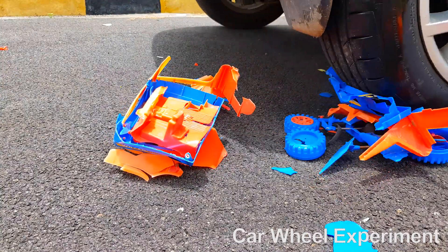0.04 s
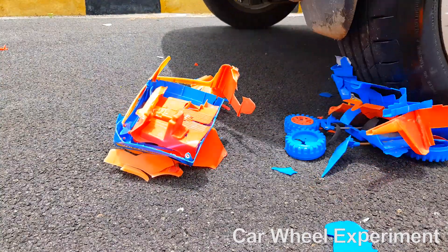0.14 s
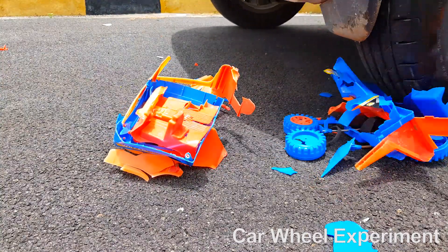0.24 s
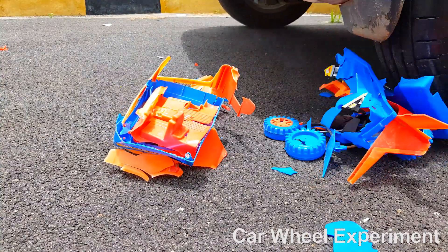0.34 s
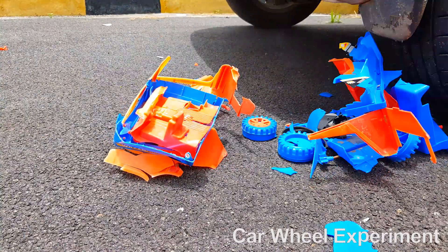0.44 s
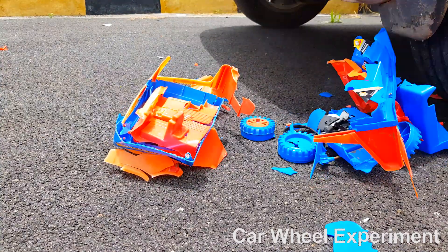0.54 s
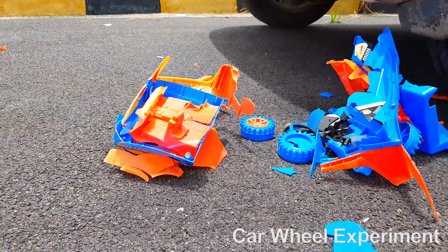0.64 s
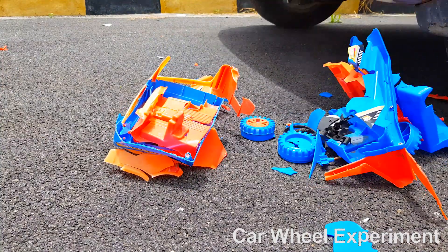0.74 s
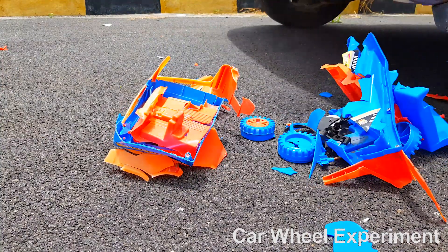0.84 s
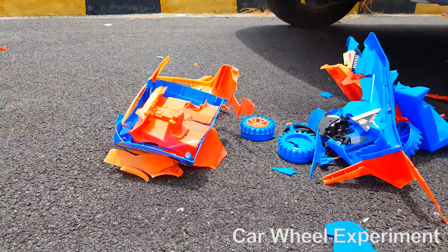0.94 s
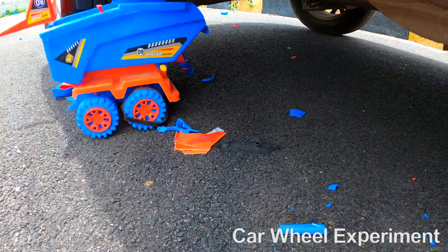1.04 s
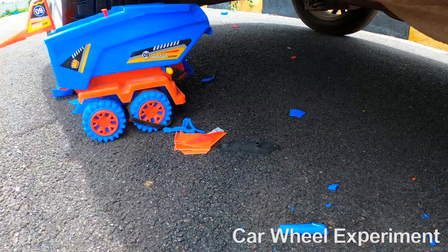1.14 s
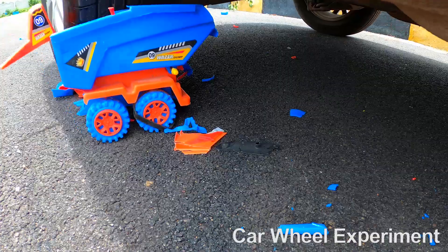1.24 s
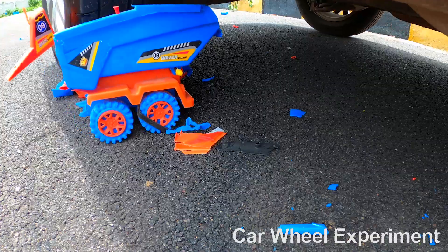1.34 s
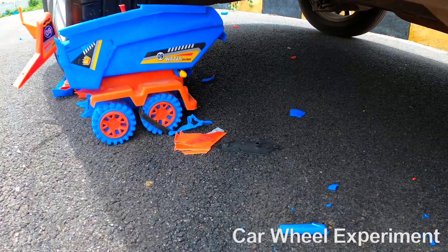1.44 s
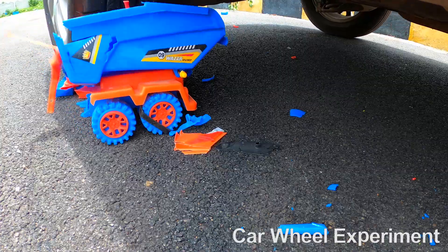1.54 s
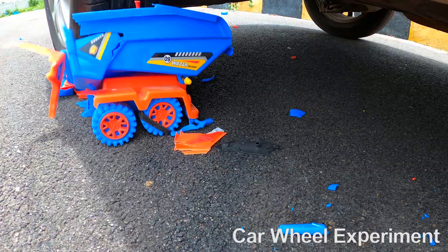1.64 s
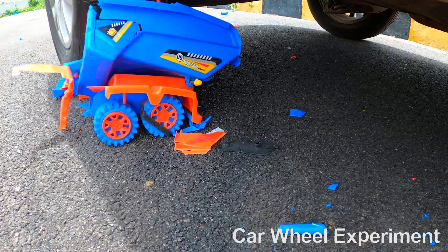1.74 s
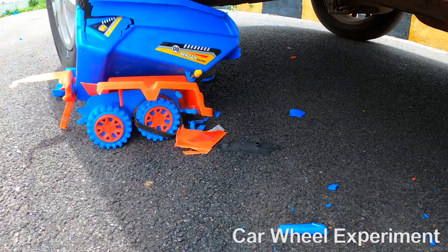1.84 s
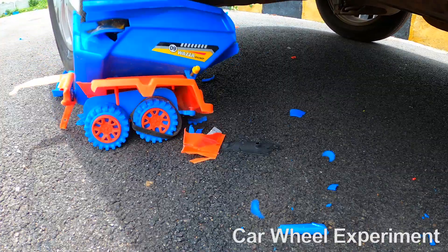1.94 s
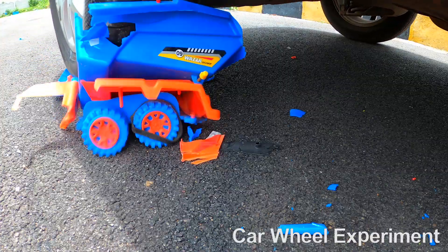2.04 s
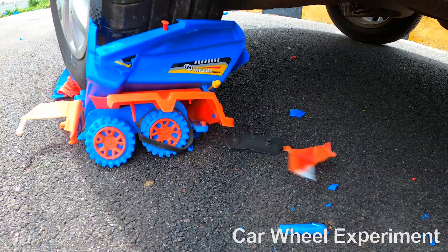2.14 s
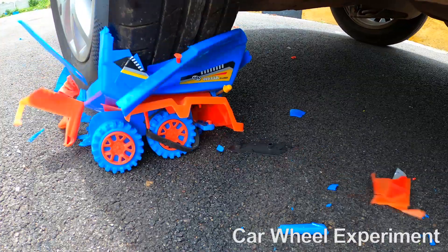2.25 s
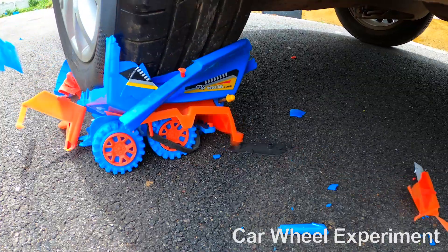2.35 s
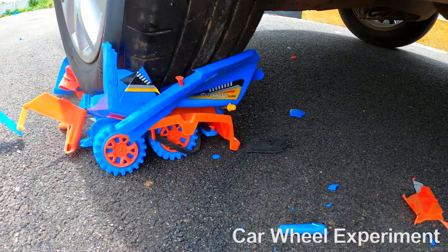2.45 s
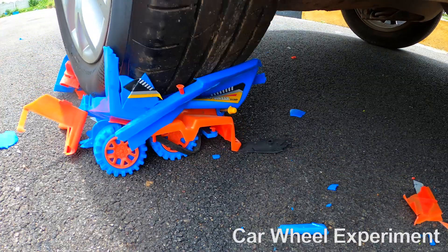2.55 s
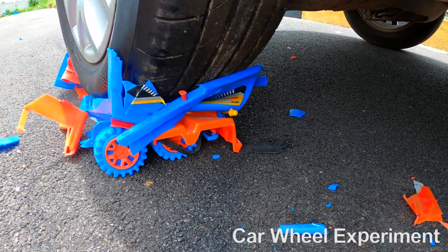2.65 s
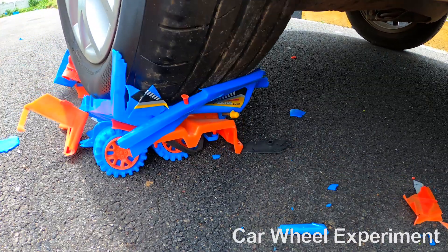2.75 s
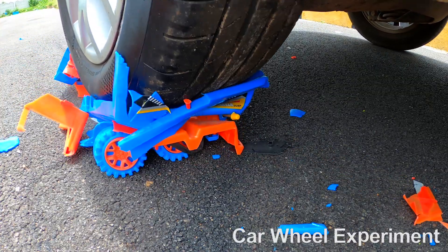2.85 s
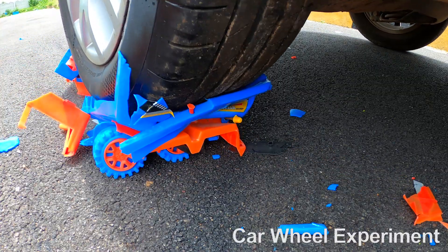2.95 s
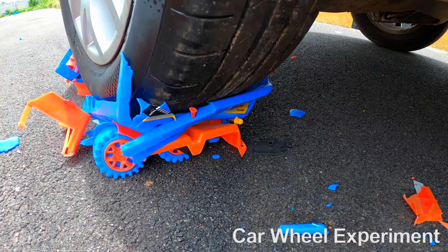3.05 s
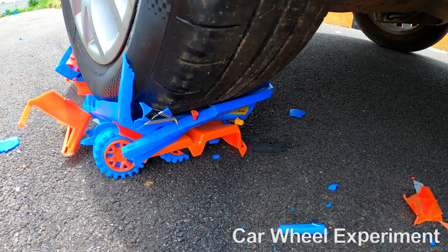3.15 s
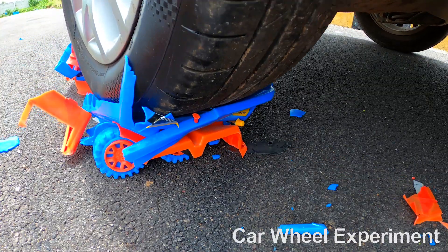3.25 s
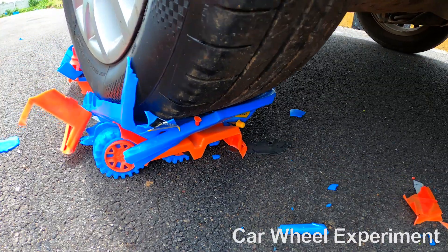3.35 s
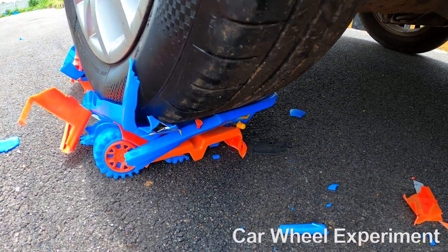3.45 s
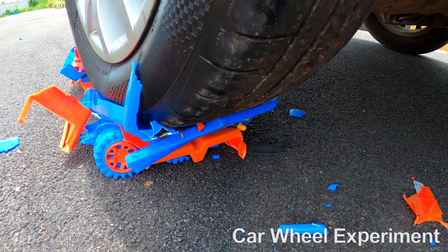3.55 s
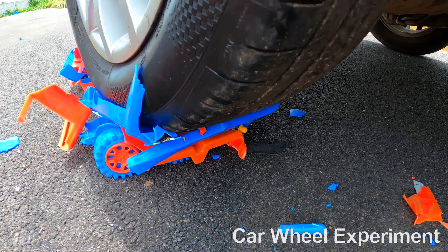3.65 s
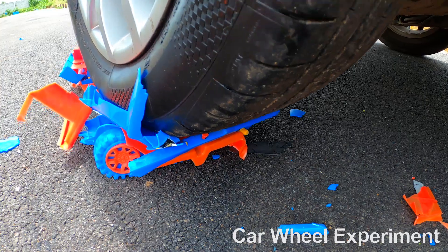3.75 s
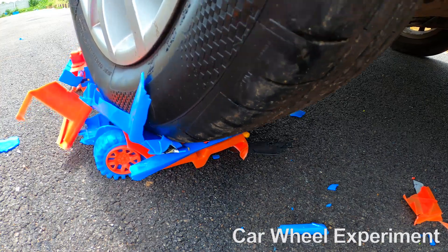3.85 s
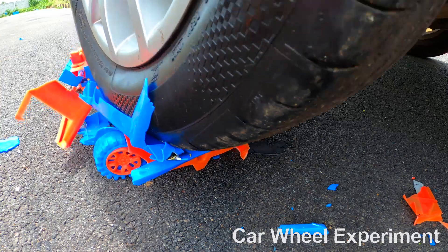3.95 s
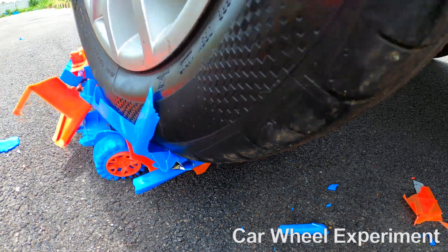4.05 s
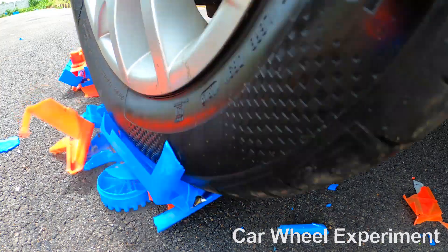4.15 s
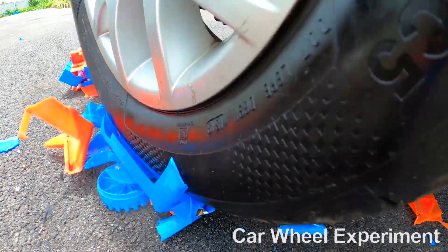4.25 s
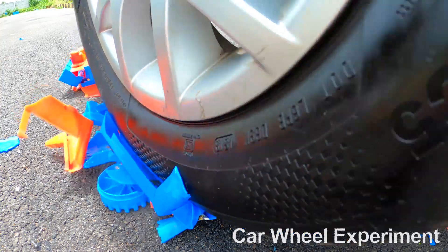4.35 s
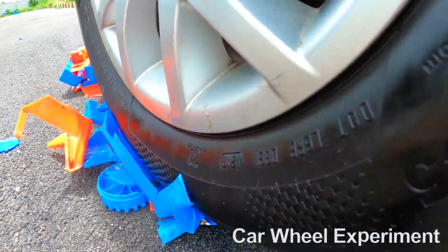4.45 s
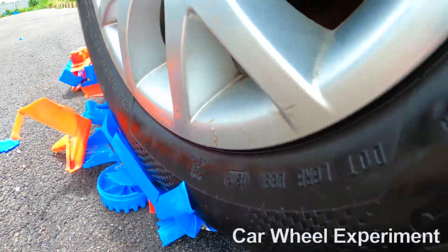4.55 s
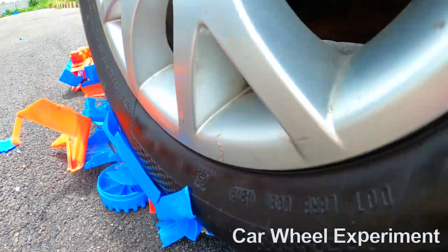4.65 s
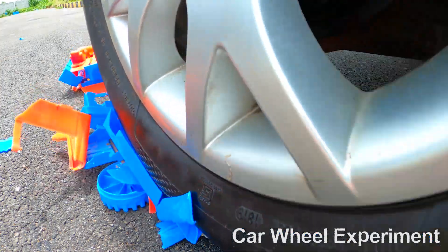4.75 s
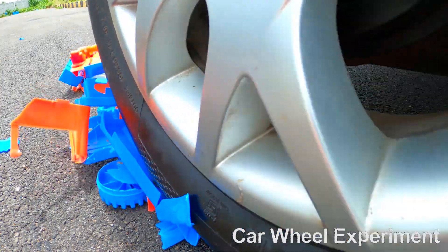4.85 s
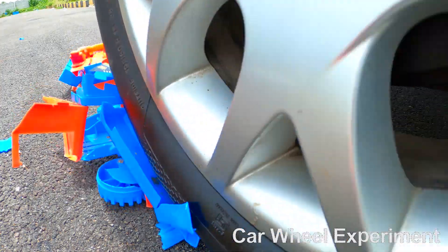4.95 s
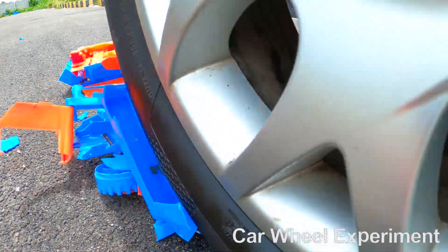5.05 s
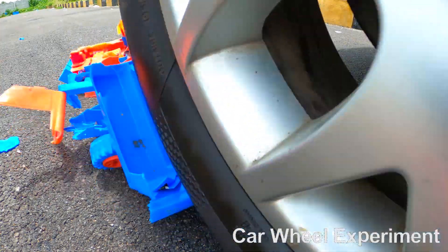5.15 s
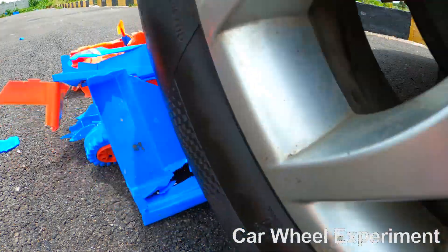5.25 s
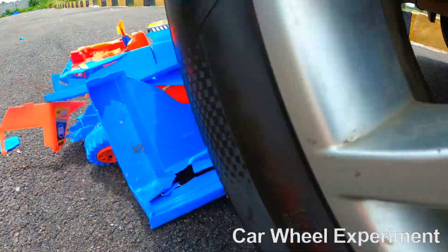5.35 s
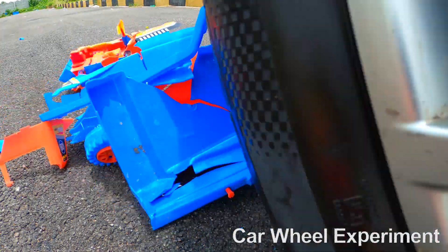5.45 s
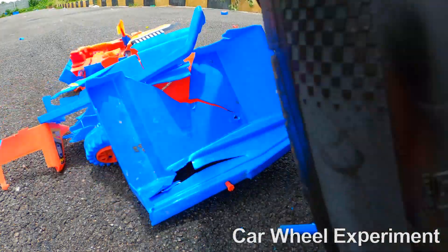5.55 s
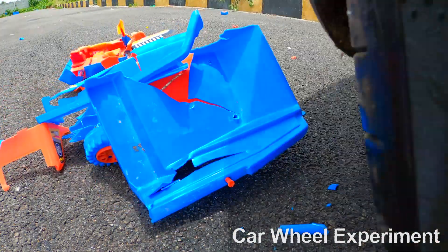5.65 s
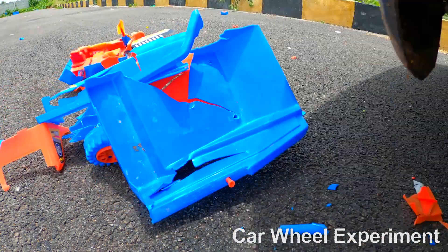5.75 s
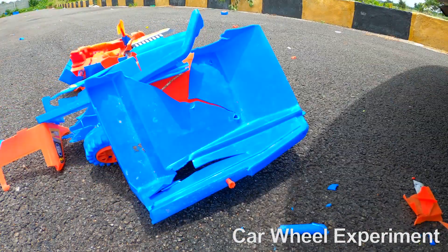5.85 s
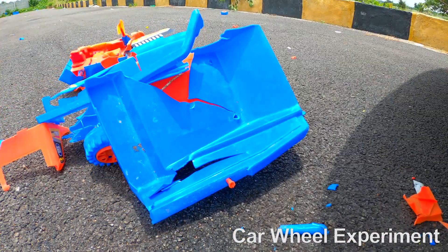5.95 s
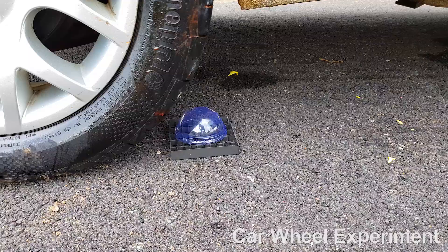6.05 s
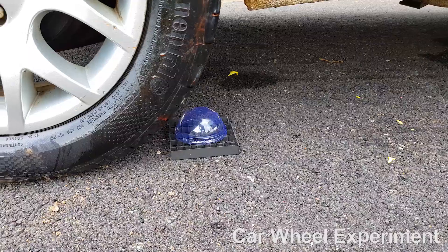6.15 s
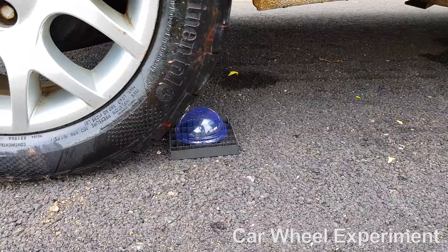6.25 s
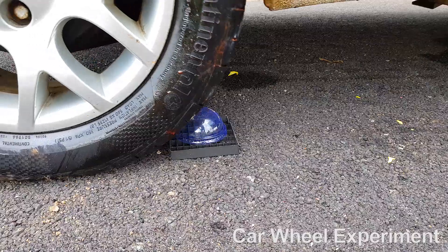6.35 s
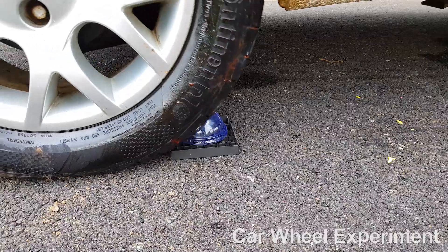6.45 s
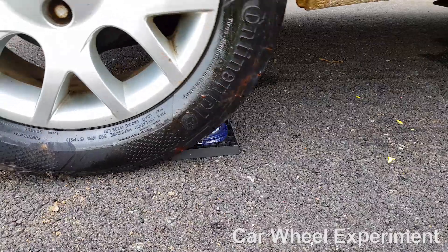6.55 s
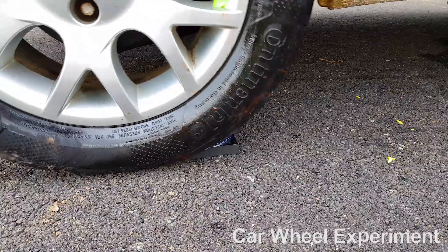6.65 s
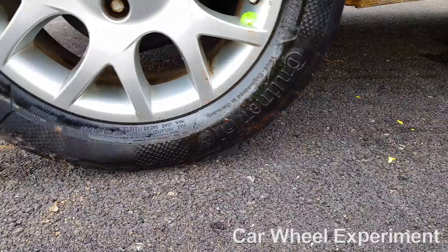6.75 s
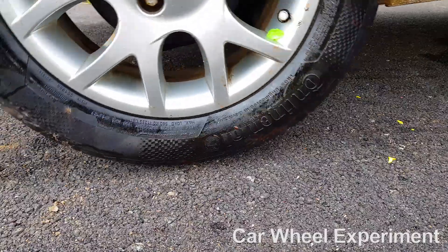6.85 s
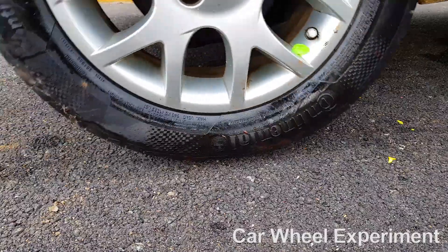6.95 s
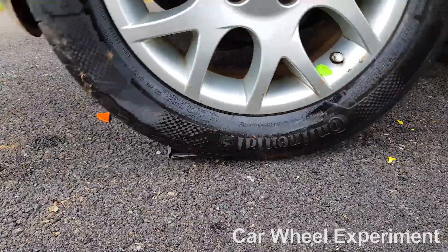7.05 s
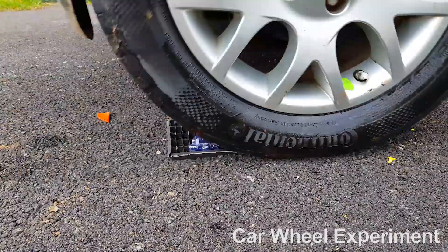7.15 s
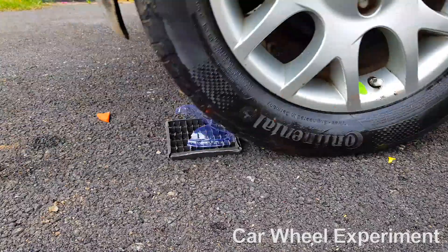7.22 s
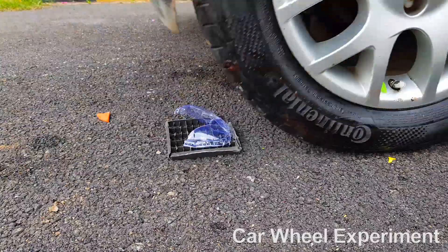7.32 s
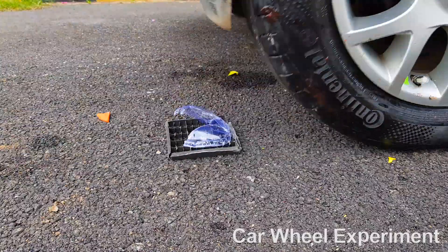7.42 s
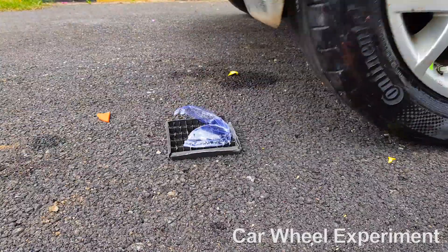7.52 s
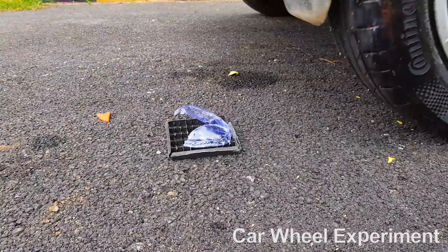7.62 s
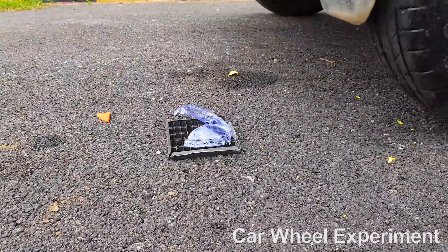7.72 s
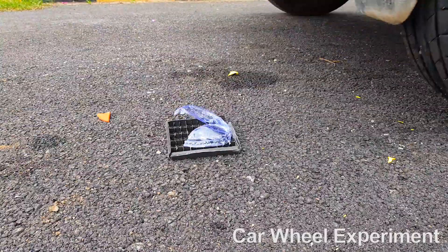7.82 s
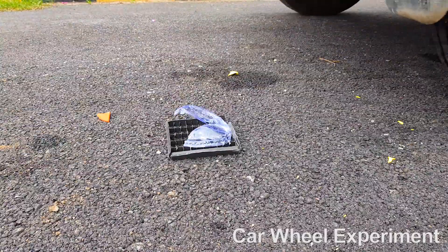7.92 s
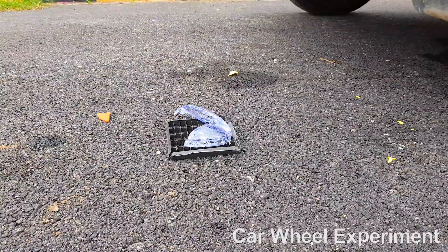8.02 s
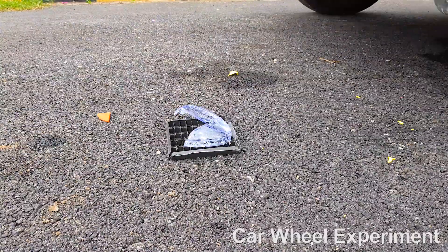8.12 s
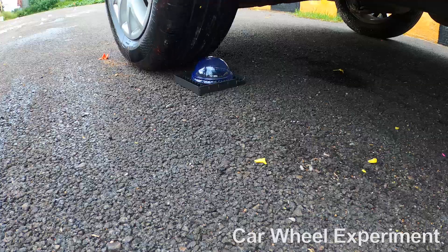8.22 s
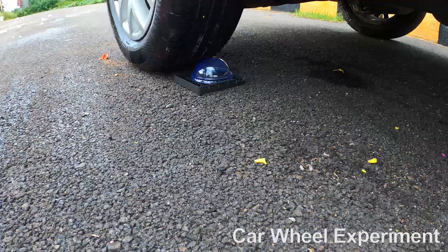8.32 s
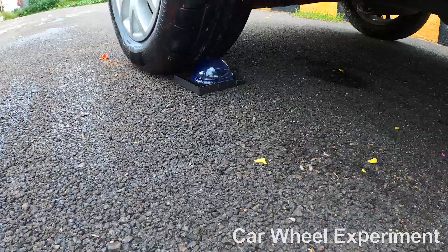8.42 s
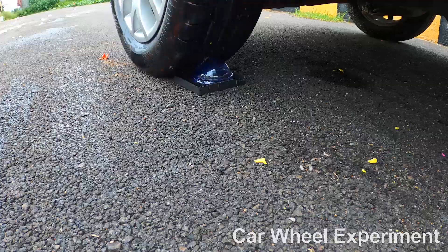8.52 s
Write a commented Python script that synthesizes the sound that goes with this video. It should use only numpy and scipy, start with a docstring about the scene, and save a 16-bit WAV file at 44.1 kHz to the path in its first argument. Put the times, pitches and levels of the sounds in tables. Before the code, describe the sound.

Close stereo sound outdoors on a road, in four abruptly joined parts. From 0 to 1 s it is quiet: light plastic fragments drag over grit and clack, mostly around 0.1 to 0.6 s. At 1.05 s a low throbbing car engine enters with gritty, hollow scraping and dry cracks; from 1.8 to 2.6 s heavy snaps and deep tyre thuds come thickly. Cracks become sparser from 2.7 to 4.2 s, with a thud near 3.1, then a dense burst at 4.2 to 4.5. A last scrape and snaps come around 5.2 to 5.4 s, leaving engine rumble. At 6.1 s the cut brings fan air and whirr; a thin dome splinters brightly from 6.5 to 7.2 s with thuds and hollow base knocks. Engine and fan recede with one small crack at 7.6. From 8.2 s a loud, steady engine drone and fan rush remain alone.

```python
"""Car crushing plastic toys

A car creeps over a hollow plastic toy truck on asphalt, then a small clear plastic dome, in four shots
joined by hard cuts. Loose shards clack first; then the toy grinds, snaps and thuds, and the dome splinters.
Cracks are runs of tiny clicks shaped by a ring; scraping and air are noise; engine and thuds are sine waves.
The last shot is only the engine and cooling fan, loud and facing the small stereo microphone outdoors."""
import sys
import numpy as np
from scipy import signal
from scipy.fft import rfft, irfft, next_fast_len
from scipy.io import wavfile
from scipy.ndimage import uniform_filter1d

SR = 44100
rng = np.random.default_rng(int(sys.argv[2]) if len(sys.argv) > 2 else 0)


def master_out(mix):
    """Clip the mix to full scale and print it as 16-bit PCM to the path in sys.argv[1]."""
    frames = np.transpose(np.atleast_2d(mix))
    ceiling = np.clip(frames, -1, 1)
    pcm = np.round(ceiling * 32767).astype(np.int16)
    wavfile.write(sys.argv[1], SR, pcm)


N = 378378
TIME = np.arange(N) / SR

# hard cuts, the starts of the toy shot, the dome shot and the facing shot: t/s
SHOT_STARTS = (1.046, 6.12, 8.22)
TOY_START, DOME_START, FACING_START = SHOT_STARTS

# engine beside the toy as heard, its level sinking after loud cracks and recovering: t/s, base level/dB
ENGINE_LEVEL = [(1.1, -26), (1.78, -26.5), (2.11, -37), (2.21, -31.5), (2.87, -39), (4.11, -28),
                (4.66, -37.5), (6.08, -25.5)]
# engine beside the dome: t/s, firing rate f/Hz, base level/dB
DRIVE_OFF = [(6.12, 34.5, -61), (6.6, 35.2, -40), (7.3, 30.47, -38.5), (7.45, 32.4, -33), (7.62, 35.4, -37),
             (7.85, 34.86, -36), (8.15, 30.43, -38)]
# deep engine noise: f/Hz, level/dB per Hz
RUMBLE = [(30, 3), (60, 7.5), (110, -9), (180, -24)]
# pulsing engine rustle: f/Hz, level/dB per Hz
RUSTLE = [(125, -10.5), (185, 7.5), (330, -4), (640, -9.5), (1100, -4.5), (2000, -14), (4500, -19),
          (7000, -42), (8500, -60)]
# fan blade tones: f/Hz, level/dB relative to each other
FAN_TONES = [(134.4, -9.5), (167.5, -3.5), (235.6, 6), (302, -2.5), (403.5, -0.5)]
# rushing fan air: f/Hz, level/dB per Hz
WHOOSH = [(45, -11), (75, -0.5), (150, -8), (270, -10.5), (450, -9.5), (800, -14.5), (1300, -27),
          (2500, -34.5)]
# high hiss of the fan: f/Hz, level/dB per Hz
HISS = [(1400, -9), (3500, 10.5), (5200, -10), (7000, 6), (9500, -8), (16000, 2)]
# noise of the car facing the microphone: f/Hz, level/dB per Hz
FACING_NOISE = [(35, 3), (130, -8), (260, -4), (600, -8.5), (1250, -23.5), (4000, -30.5), (8000, -45.5),
                (15000, -99)]

# how alike left and right are near the toy: f/Hz, likeness (0-1)
TOY_LIKENESS = [(2000, 0.98), (5000, 0.89), (8000, 0.78), (14000, 0.1)]
# how alike left and right are near the dome: f/Hz, likeness (0-1)
DOME_LIKENESS = [(100, 0.94), (500, 0.56), (1200, 0.039), (3000, 0.27), (6000, 0.21), (14000, 0.057)]
# left and right fully alike, for sound from ahead: f/Hz, likeness (0-1)
AHEAD_LIKENESS = [(100, 1)]

# loose fragments dragged out from under the tyre: start t/s, length t/s, level/dB
DRAGS = [(0, .01, -67.5), (0.07, 0.018, -60), (0.15, 0.065, -59.5), (0.225, 0.037, -45.5),
         (0.32, 0.084, -40), (0.62, 0.067, -66.5)]
# colour of the dragged fragments: f/Hz, level/dB per Hz
FRAGMENTS = [(220, -17), (400, -16), (1200, 1), (2500, -4.5), (6000, -18), (10000, -14.5), (16000, -35)]
# clacks of loose shards: t/s, level/dB, ring f/Hz, brightness level/dB per octave, contact t/s
CLACKS = [(0.1243, -41.5, 10000, 10.5, 0.0004), (0.240, -35.5, 1200, -2.5, 0.0047),
          (0.264, -38.5, 1400, -4, 0.003), (0.56, -51, 3300, -1, 0.0018), (0.304, -37, 1000, -2, 0.003)]
# the wheel pushes the shell over grit: start t/s, length t/s, scrape base level/dB, crackle level/dB
SHOVES = [(1.055, 0.12, -26.5, -38.5), (1.1, 0.14, -24.5, -41), (1.3, 0.09, -23.5, -42),
          (1.4, 0.15, -34.5, -42), (1.51, 0.088, -26.5, -38.5), (1.63, 0.045, -24.5, -36.5),
          (1.775, 0.022, -19.5, -39), (1.85, 0.067, -27, -44), (2.05, 0.047, -32, -36.5),
          (2.18, 0.013, -26.5, -34), (2.225, 0.077, -30.5, -29), (2.39, 0.022, -28.5, -29.5),
          (3.13, 0.011, -39, -28), (4.32, 0.043, -28.5, -29), (5.05, 0.13, -54, -46.5),
          (5.21, 0.24, -35, -38.5), (5.325, 0.037, -27.5, -32.5)]
# colour of the shell's scraping: f/Hz, gain of a wall mode there level/dB
SCRAPE = [(120, 2), (250, 0.5), (380, -1), (750, 0), (1200, -2.5), (2000, -16), (3000, -29)]
# colour of the fine crackle: f/Hz, level/dB per Hz
CRACKLE = [(800, 7), (2000, 15), (4800, 3.5), (8000, -9), (16000, -51)]

# the tyre drops as a wall collapses: t/s, base level/dB
THUDS = [(1.838, -13.5), (1.931, -12.5), (2.06, -13.5), (2.178, -13), (2.287, -9), (2.408, -15),
         (2.587, -18), (2.617, -21.5), (3.137, -17), (4.222, -18), (4.329, -11), (4.36, -12), (4.439, -18),
         (6.698, -17), (7.019, -29)]
# tyre carcass and the air inside it: f/Hz, level/dB relative to the thud, 60 dB fade t/s
TYRE_MODES = [(71.4, -7.5, 0.19), (97.6, -6.5, 0.28), (141.3, -7.5, 0.12), (214.6, -4.5, 0.044),
              (242.0, -23.5, 1.0)]

# how hard the dome crackles under the tread: t/s, base level/dB
DOME_STRAIN = [(6.42, -56), (6.56, -36.5), (6.72, -40), (6.86, -43), (6.92, -53), (7.135, -48), (7.15, -36),
               (7.21, -36), (7.25, -70)]
# breaks of the thin dome: t/s, level/dB, ring f/Hz, brightness level/dB per octave, tear t/s
DOME_CRACKS = [(6.5366, -24.0, 1110, -0.5, 0.009), (6.5595, -22, 4550, -5, 0.0074),
               (6.6134, -19.5, 2140, 0.5, 0.0019), (6.6173, -15, 1030, 1.5, 0.0038),
               (6.6259, -21.5, 910.0, 1, 0.0037), (6.6888, -20, 600.0, -1, 0.0015),
               (6.7547, -23, 2440.0, -1, 0.001), (6.7761, -22.5, 2640, -2.5, 0.0027),
               (6.83, -27, 3720.0, 1, 0.0012), (6.8466, -23, 3720.0, -1.5, 0.0019),
               (6.8572, -19.5, 3600, 0, 0.00092), (6.9829, -27, 634, -1.5, 0.0024),
               (7.0111, -19, 3700, -2, 0.001), (7.143, -25, 3440, 2, 0.0015),
               (7.1899, -25.5, 3180, 4, 0.0071), (7.2136, -32.5, 4280.0, 0.5, 0.002),
               (7.6398, -33, 1880, -2.5, 0.0025)]
# colour of a dome snap: f/Hz, level/dB per Hz
DOME_SNAP = [(150, -22), (400, -3.5), (1000, 1.5), (5000, -1.5), (15000, -9.5)]
# the base plate rocks as the tread leaves it: t/s, base level/dB
PLATE_KNOCKS = [(6.689, -14.5), (6.704, -18.5), (6.984, -13.5), (7.012, -18.5), (7.031, -18.5)]
# ringing of the dome's base plate: f/Hz, level/dB relative to the knock, 60 dB fade t/s
PLATE_MODES = [(445, -2.5, 0.03), (562, -1, 0.044), (713, -3, 0.054), (910, -12.5, 0.063)]
# breaks of the toy: t/s, level/dB, ring f/Hz, brightness level/dB per octave, tear t/s
TOY_CRACKS = [(1.047, -25.5, 600.0, 2, 0.0032), (1.1186, -23.5, 1140, -6, 0.001),
              (1.1434, -22, 600.0, -3.0, 0.0061), (1.1567, -25, 2440.0, -1.5, 0.0034),
              (1.1978, -18.5, 790.0, -4.5, 0.0078), (1.2489, -19, 850.0, -3.0, 0.0049),
              (1.2785, -28.5, 2800, 1.5, 0.004), (1.3052, -21.5, 740.0, -6.5, 0.007),
              (1.4222, -27, 600.0, -2.5, 0.0041), (1.5466, -23.5, 2840, -2.0, 0.0029),
              (1.5774, -24.5, 4600, -3.5, 0.0051), (1.6052, -25.5, 1490.0, 0, 0.001),
              (1.6324, -25, 980.0, -4, 0.0051), (1.7228, -18.5, 1760, -0.5, 0.0023),
              (1.776, -25, 7060, -2.5, 0.0041), (1.789, -14.5, 1890, -2.0, 0.0026),
              (1.8357, -18.5, 1050.0, -4.0, 0.0024), (1.848, -20.0, 7200, -4.0, 0.0023),
              (1.881, -14, 600.0, -1.5, 0.0034), (1.8994, -26, 5290.0, 5, 0.0017),
              (1.928, -15.5, 600.0, 1.5, 0.0018), (2.0471, -20, 690.0, -0.5, 0.002),
              (2.059, -14.5, 600.0, 0.5, 0.0037), (2.1606, -22, 5290.0, 0.5, 0.0015),
              (2.178, -19.0, 600.0, -2.0, 0.0036), (2.232, -24, 1490.0, 2, 0.0027),
              (2.2579, -18, 600.0, 3.5, 0.0022), (2.2842, -18, 7000.0, -2.5, 0.0043),
              (2.342, -22, 600.0, 1.0, 0.0022), (2.383, -21, 1060, 1.5, 0.0034),
              (2.4075, -14.5, 2620.0, 1, 0.0023), (2.5061, -20.0, 2480, -2.5, 0.0029),
              (2.563, -24.5, 1600.0, -2, 0.0031), (2.589, -13, 3280, -3.0, 0.00094),
              (2.755, -35, 3720.0, 0.5, 0.002), (2.7944, -24, 1420, 4.5, 0.0017),
              (2.853, -18.5, 1600.0, 2.0, 0.00062), (2.915, -20, 2770, -4.5, 0.0018),
              (3.0855, -25, 640.0, 2.5, 0.0018), (3.0994, -19.5, 1320, -6, 0.00081),
              (3.1313, -16.5, 1140, 1.5, 0.0028), (3.1388, -20.5, 7300, -2.5, 0.0019),
              (3.2493, -35.5, 4250, 0.5, 0.0095), (3.529, -27, 1380, 1.5, 0.0015),
              (3.8393, -21.5, 960, -3.5, 0.0069), (3.915, -25.5, 4900, 0, 0.0025),
              (3.92, -23.5, 2650, -3, 0.0028), (4.0431, -25.5, 2070, -3, 0.00083),
              (4.2246, -17.5, 600.0, 5, 0.0003), (4.301, -24, 4590.0, -1.5, 0.0023),
              (4.3156, -20, 4280.0, 2, 0.00086), (4.3249, -15, 1310, 3.5, 0.0042),
              (4.358, -18.5, 4800, -1.5, 0.0038), (4.374, -21.5, 600.0, 1.0, 0.0022),
              (4.434, -23.0, 600.0, 2, 0.0019), (4.5102, -21.5, 1040, -2, 0.0037),
              (4.7082, -30, 3020.0, -2.5, 0.0015), (4.7248, -30, 2150, -1.5, 0.0029),
              (4.8449, -21, 2240, 2, 0.0029), (4.8908, -25, 1970, -4.5, 0.0028),
              (5.0976, -37.5, 600.0, 17, 0.0022), (5.208, -25, 1600.0, -3.5, 0.002),
              (5.214, -22, 1610, -2, 0.0015), (5.2377, -24.5, 1500, -5, 0.0023),
              (5.278, -19, 1130.0, -2.5, 0.0037), (5.3292, -25.5, 1720.0, -3, 0.0049),
              (5.366, -26.5, 860, 4, 0.0046)]
# colour of a toy snap: f/Hz, level/dB per Hz
TOY_SNAP = [(150, -19), (400, -5.5), (1000, 3.5), (2500, 1), (5000, -2.5), (9000, -17), (15000, -37.5)]

SHOVE_ATTACK_S, SHOVE_T60_S = 0.0034, 0.11   # a push takes hold; shortest settling time
SETTLE_S_PER_S = 1.17   # longer slides take longer to settle
RUSTLE_FADES_AT_S, RUSTLE_FADE_DB_PER_S = 5.38, 15   # the wheel has passed and screens the engine bay
FAN_DB, FAN_HISS_DB = -33.5, -47   # while close by
FAN_LEAVES_AT_S, FAN_DISTANCE_M, CAR_M_PER_S = 6.65, 0.46, 0.97
TREAD_TICKS_DB, TREAD_TICKS_PER_S = -10.5, 39   # base level relative to the engine's
RING_DB, RING_OCTAVES = 8, 0.42   # height and width of a shard's resonance
CUTOFF_HZ = 16000


def from_db(db):
    """Turn decibels into gain."""
    return 10 ** (np.asarray(db) / 20)


def rms_one(x):
    """Scale to an average strength (rms) of 1."""
    return x / np.sqrt(np.mean(x ** 2) + 1e-20)


def in_time(rows):
    """Make one curve per column, joined by straight lines."""
    s, *columns = np.transpose(rows)
    return [np.interp(TIME, s, c) for c in columns]


def at_hz(points, hz):
    """Read a table along a log-frequency axis."""
    table = np.array(points)
    return np.interp(np.log(hz), np.log(table[:, 0]), table[:, 1])


def between(start, end):
    """Give 1 from start to end and 0 outside."""
    return (TIME >= start) & (TIME < end)


def drift(rate_hz):
    """Wander at random with spread 1: noise smoothed twice, made at one point per 40 samples."""
    r = np.exp(-80 * np.pi * rate_hz / SR)
    noise = rng.standard_normal(N // 40 + 2002)
    slow = signal.lfilter([1], [1, -2 * r, r * r], noise)[2000:]   # skip the filter's start
    return np.interp(np.arange(N) / 40, np.arange(len(slow)), rms_one(slow))


def band(x, low_hz, high_hz, order=2):
    """Keep only the frequencies between two limits."""
    limits = [low_hz, min(high_hz, .48 * SR)]
    return signal.sosfilt(signal.butter(order, limits, "band", fs=SR, output="sos"), x + 1e-18)


def add(out, at_s, sound):
    """Mix a short sound in at a given time."""
    i = round(at_s * SR)
    out[..., i:i + sound.shape[-1]] += sound[..., :N - i]


def spread(mid, side, alike):
    """Make two channels with a given likeness, at unchanged power."""
    alike = np.clip(alike, 0, 1)
    return (np.sqrt(1 + alike) * mid + np.sqrt(1 - alike) * side * [[1], [-1]]) / np.sqrt(2)


def left_late(x, lag_s):
    """Delay the left channel, as sound from one side reaches the two ports at different times."""
    size = next_fast_len(N + 64)
    turn = np.exp(-2j * np.pi * np.arange(size // 2 + 1) * SR / size * lag_s)
    return np.array([irfft(rfft(x[0], size) * turn, size)[:N], x[1]])


def coloured(spectrum, likeness, patchy_db, bursts=1):
    """Noise shaped in time by bursts, in half-octave bands that each waver in level; rms 1."""
    out = 0
    edges = 31 * 2 ** np.arange(0, 9.1, .5)
    white = rng.standard_normal((2, 2, N)) * bursts
    for k, (low, high) in enumerate(zip(edges, edges[1:])):
        hz = np.sqrt(low * high)
        if spectrum[0][0] < hz < spectrum[-1][0]:
            gain = from_db(at_hz(spectrum, hz) + patchy_db * drift(28.0))
            mid, side = band(white[k % 2], low, high)   # neighbouring bands use different noise
            out = out + gain * spread(mid, side, at_hz(likeness, hz))
    return rms_one(out)


def slips(per_s, size_db, fade_s):
    """Stick-slip envelope: uneven jerks that die at once, evened out over a stroke."""
    sizes = from_db(size_db * np.minimum(rng.exponential(1, N), 4)) ** 2
    jerks = (rng.random(N) < per_s / SR) * sizes
    power = signal.lfilter([1], [1, -np.exp(-2 / (fade_s * SR))], jerks + 1e-4)
    return np.sqrt(power / uniform_filter1d(power, size=2200))


def strokes(rows, attack_s, t60_s):
    """Pushes take hold, last a while and settle; one gain curve per level column."""
    power = 0
    for start_s, length_s, *levels_db in rows:
        rise = np.clip((TIME - start_s) / attack_s, 0, 1)
        settle_s = t60_s + SETTLE_S_PER_S * length_s
        settle = from_db(-60 * np.clip((TIME - start_s - length_s) / settle_s, 0, 2))
        power = power + (from_db(levels_db)[:, None] * rise * settle) ** 2
    return np.sqrt(power + 1e-12)


def with_spectrum(x, gain):
    """Give a short sound a broad spectral shape with a causal filter; its fine ripple stays."""
    spectrum, half = rfft(x), len(x) // 2
    power = uniform_filter1d(np.abs(spectrum) ** 2, size=128) + 1e-12
    # keeping only the first half of the cepstrum makes the filter act after the sound, not before
    cepstrum = irfft(np.log((gain ** 2 + 1e-9) / power))[:half]
    cepstrum[0] /= 2
    return irfft(spectrum * np.exp(rfft(cepstrum, len(x))))


def crack(level_db, ring_hz, bright_db, tear_s, snap, likeness, tail_db, tail_s):
    """One break: a run of tiny fractures sets a shard ringing at its own pitch."""
    t = np.arange(4096) / SR
    hits = rng.standard_normal(len(t)) * (rng.random(len(t)) < 3500 / SR)
    sizes = hits * np.exp(-t / (1.48 * tear_s)) * (t < 3 * tear_s)
    fractures = sizes / (np.linalg.norm(sizes) + 1e-9) * min(tear_s / 0.0016, 3)
    fractures[0] += 1   # the first snap

    hz = np.maximum(np.fft.rfftfreq(len(t), 1 / SR), 100)
    octaves = np.log2(hz / ring_hz)
    ring = RING_DB * np.exp(-.5 * (octaves / RING_OCTAVES) ** 2)
    gain = rms_one(from_db(at_hz(snap, hz) + bright_db * octaves + ring))
    alike = np.clip(at_hz(likeness, hz), 0, .99)

    def two_ports(mid, side):
        """Colour the shared and differing parts, then make left and right."""
        shared = with_spectrum(mid, gain * np.sqrt(1 + alike))
        return shared + with_spectrum(side, gain * np.sqrt(1 - alike)) * [[1], [-1]]

    # walls ring on briefly; road, tyre and underbody throw back a short scatter
    fades_s = np.array([[tail_s], [tail_s], [.0012], [.0014]])
    scatter = rng.standard_normal((4, len(t))) * np.exp(-t / fades_s)
    echoes = signal.fftconvolve(scatter, fractures[None], axes=1)[:, :len(t)]
    far, far_side, near_side, wall = echoes
    near = two_ports(fractures + .16 * wall, near_side)   # the ports hear different near reflections
    tail = two_ports(far, far_side)
    # the last factor refers the level to about 10 ms
    return rng.choice([-1, 1]) * from_db(level_db) * (near + from_db(tail_db) * tail) * np.sqrt(SR / 200)


def toy_crack(*break_row):
    """Thick hollow walls snap with a dry clack."""
    return crack(*break_row, TOY_SNAP, TOY_LIKENESS, tail_db=-10.5, tail_s=0.013)


def dome_crack(*break_row):
    """Thin brittle plastic splinters much more brightly."""
    return crack(*break_row, DOME_SNAP, DOME_LIKENESS, tail_db=-8.0, tail_s=0.016)


def small_cracks(kind, level_db, per_s, uneven_db):
    """Lesser snaps at random moments and pitches, following the given level curve."""
    pieces = []
    for _ in range(30):
        ring_hz = 900 * 5 ** rng.random()
        pieces.append(kind(rng.normal(0, 2), ring_hz, rng.normal(0, 1.5), rng.uniform(.0004, .002)))
    out = np.zeros((2, N))
    moments = np.cumsum(rng.gamma(2, .5, 3000)) / per_s
    for k, s in enumerate(moments[moments < TIME[-1]]):
        snap_db = level_db[int(s * SR)] + uneven_db * (1 - 5.8 * rng.random())
        add(out, s, from_db(snap_db) * pieces[k % len(pieces)])
    return out


def rustle_fade_db():
    """How far the small sounds of the car have sunk once the wheel is past."""
    return RUSTLE_FADE_DB_PER_S * np.maximum(TIME - RUSTLE_FADES_AT_S, 0)


def engine():
    """Four cylinders throb at the firing rate and its multiples, with rumble and a pulsing rustle."""
    base_db, = in_time(ENGINE_LEVEL)
    turn = 2 * np.pi * np.cumsum(28.6 * (1 + .012 * drift(5))) / SR   # firing rate 28.6 Hz, wavering
    throb = from_db(base_db + 1.5) * np.sin(turn)
    # the +1 is a silent offset that follows the level
    throb = throb + from_db(base_db - 7.5) * (np.sin(3 * turn) + 1 + from_db(-7.5) * np.sin(2 * turn))
    throb = throb + from_db(base_db - 19) * (np.sin(6 * turn) + .7 * np.sin(6.25 * turn))
    pulses = 1 + 0.26 * np.sin(turn)
    rustle = coloured(RUSTLE, AHEAD_LIKENESS, patchy_db=2.0, bursts=pulses)
    rustle = from_db(base_db - 11 - rustle_fade_db()) * rustle
    rumble = from_db(base_db - 11) * coloured(RUMBLE, AHEAD_LIKENESS, patchy_db=-0.5)
    beside_toy = throb + rustle + rumble

    rate_hz, drive_db = in_time(DRIVE_OFF)
    rev = 2 * np.pi * np.cumsum(rate_hz) / SR
    orders = np.sin(2 * rev) + from_db(-12) * np.sin(rev) + from_db(-3.5) * np.sin(3 * rev)
    beside_dome = from_db(drive_db - 1.5) * orders

    distant = from_db(-71.0) * np.sin(3 * turn) + from_db(-83) * np.sin(turn)
    facing = from_db(-27.0) * np.sin(.95 * turn) + from_db(-30) * np.sin(2 * rev)
    return (distant * between(0, TOY_START) + beside_toy * between(TOY_START, DOME_START)
            + beside_dome * between(DOME_START, FACING_START) + facing * (TIME >= FACING_START))


def fan():
    """Blade tones in rushing air fade with distance as the car leaves, and are loud when it faces us."""
    moved_m = CAR_M_PER_S * np.maximum(TIME - FAN_LEAVES_AT_S, 0)
    farther_db = 20 * np.log10(1 + moved_m / FAN_DISTANCE_M)
    tones = 0
    for hz, db in FAN_TONES:
        level = from_db(db + 2 * drift(11.0))
        phase = 2 * np.pi * np.cumsum(hz * (1 + 0.0044 * drift(7.55))) / SR
        tones = tones + level * np.sin(phase)
    whoosh = coloured(WHOOSH, DOME_LIKENESS, patchy_db=0.0)
    hiss = coloured(HISS, DOME_LIKENESS, patchy_db=3.0)
    leaving = from_db(FAN_DB - farther_db) * (whoosh + from_db(-10.0) * tones)
    leaving = leaving + from_db(FAN_HISS_DB - 1.06 * farther_db) * hiss
    facing = from_db(-28.5) * coloured(FACING_NOISE, AHEAD_LIKENESS, patchy_db=3) + from_db(-37.5) * tones
    return leaving * between(DOME_START, FACING_START) + facing * (TIME >= FACING_START)


def fragments():
    """Loose shards are dragged over the grit in small slips and clack together."""
    drag, = strokes(DRAGS, attack_s=0.0038, t60_s=0.25)
    jerks = slips(per_s=840, size_db=2.0, fade_s=0.0029)
    out = drag * coloured(FRAGMENTS, DOME_LIKENESS, patchy_db=2.5, bursts=jerks)
    for s, *break_row in CLACKS:
        add(out, s, dome_crack(*break_row))
    return out


def tread():
    """Grit and splinters crunch under the rolling tread, muffled by the rubber."""
    engine_db, = in_time(ENGINE_LEVEL)
    level_db = engine_db + TREAD_TICKS_DB - rustle_fade_db()
    ticks = small_cracks(toy_crack, level_db, per_s=TREAD_TICKS_PER_S, uneven_db=-0.5)
    return band(ticks, low_hz=600, high_hz=3150) * between(TOY_START, DOME_START)


def judder(force, per_s, sharpness):
    """Grains of grit catch the shell; each catch rings one of its many wall modes. Rms 1."""
    catches = (rng.random(N) < per_s / SR) * rng.standard_normal(N) * force
    modes_hz = np.geomspace(140, 2800, num=32)
    dealt = rng.integers(0, len(modes_hz), N)   # which mode each catch rings
    out = 0
    for k, hz in enumerate(modes_hz):
        b, a = signal.iirpeak(hz, sharpness, fs=SR)
        out = out + from_db(at_hz(SCRAPE, hz)) * signal.lfilter(b, a, catches * (dealt == k) + 1e-18)
    return rms_one(out)


def grinding():
    """The shell judders over the grit: coarse slips boom in the hollow body, fine ones crackle."""
    scraping, crackling = strokes(SHOVES, SHOVE_ATTACK_S, SHOVE_T60_S)
    coarse = slips(per_s=370, size_db=6.0, fade_s=0.0089)
    fine = slips(per_s=800, size_db=2.5, fade_s=0.0013)
    scrape = scraping * from_db(-2.5) * judder(coarse, per_s=3200, sharpness=17.5)
    crackle = crackling * coloured(CRACKLE, TOY_LIKENESS, patchy_db=1.5, bursts=fine)
    return left_late(scrape + crackle, 1.2e-5) * between(TOY_START, DOME_START)


def tyre():
    """Each drop thuds in the carcass and sets the air ring inside the tyre humming."""
    out, t = np.zeros((2, N)), np.arange(SR // 2) / SR
    for s, level_db in THUDS:
        for hz, mode_db, t60 in TYRE_MODES:
            detune = np.exp(rng.normal(0, 0.012) / t60 / 2)   # short hums vary more in pitch
            port_phase = rng.normal(0, 0.35, (2, 1)) * np.minimum(hz * t, 1)
            fade = from_db(level_db + mode_db - 60 * t / t60)
            add(out, s, rng.choice([-1, 1]) * fade * np.sin(2 * np.pi * hz * detune * t + port_phase))
    return out


def dome():
    """The dome crackles under the tread and splinters; its base plate gives hollow knocks."""
    strain_db, = in_time(DOME_STRAIN)
    out = small_cracks(dome_crack, strain_db, per_s=220, uneven_db=7.0) * between(DOME_START, FACING_START)
    for s, *break_row in DOME_CRACKS:
        add(out, s, dome_crack(*break_row))
    t = np.arange(8192) / SR
    for s, level_db in PLATE_KNOCKS:
        for hz, mode_db, t60 in PLATE_MODES:
            fade = from_db(level_db + mode_db - 60 * t / t60)
            ring = np.sin(2 * np.pi * hz * rng.normal(1, 0.012) * t)
            add(out, s, rng.choice([-1, 1]) * fade * ring)
    return left_late(out, -0.00006)   # negative: left comes first


def flex(level_db, panel_hz, fade_s):
    """The freed panel springs back with a brief low knock, given a slight random stereo width."""
    t = np.arange(4096) / SR
    hz = panel_hz * np.array([[.4], [1], [1.5]]) * np.exp(rng.normal(0, 0.23, (3, 1)))
    fade = np.exp(-t / fade_s * np.sqrt(hz / panel_hz))   # higher modes die sooner
    modes = rng.choice([-1, 1], (3, 1)) * np.sin(2 * np.pi * hz * t) * fade
    return from_db(level_db) * (1 + rng.normal(0, 0.16, (2, 3))) @ modes


def toy():
    """Big breaks with a panel knock each, lesser ones mainly while the shell grinds hard, and tread grit."""
    shoves = strokes(SHOVES, SHOVE_ATTACK_S, SHOVE_T60_S)
    strain_db = np.mean(20 * np.log10(shoves), axis=0)
    below_yield_db = np.minimum(strain_db + 34, 0)   # weak pushes are turned down further
    lesser = small_cracks(toy_crack, strain_db + below_yield_db - 1, per_s=80, uneven_db=4.0)
    out = lesser * between(TOY_START, DOME_START) + tread()
    for s, level_db, ring_hz, bright_db, tear_s in TOY_CRACKS:
        add(out, s, toy_crack(level_db, ring_hz, bright_db, tear_s))
        # duller breaks knock harder
        add(out, s, flex(level_db - 12.5 - 0.57 * bright_db, panel_hz=312.0, fade_s=0.012))
    return left_late(out, 1.3e-5)


def scene():
    """Breaking plastic over the running car."""
    return engine() + fan() + fragments() + grinding() + tyre() + dome() + toy()


def record(dry):
    """Round the sharpest peaks and cut the top of the treble."""
    rounded = 1.504 * np.tanh(dry / 1.185)
    return signal.sosfilt(signal.ellip(10, .1, 80, CUTOFF_HZ, fs=SR, output="sos"), rounded)


dry = scene()
out = record(dry)
master_out(out)
```